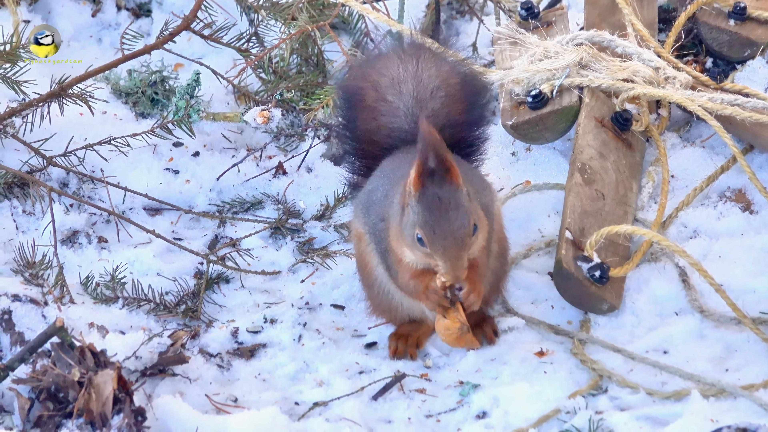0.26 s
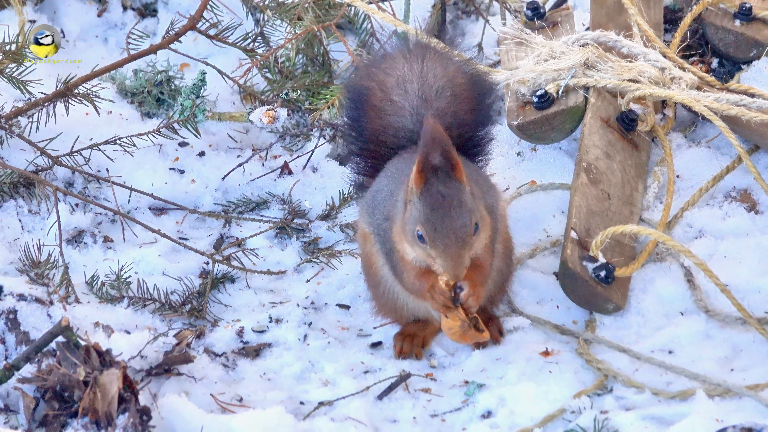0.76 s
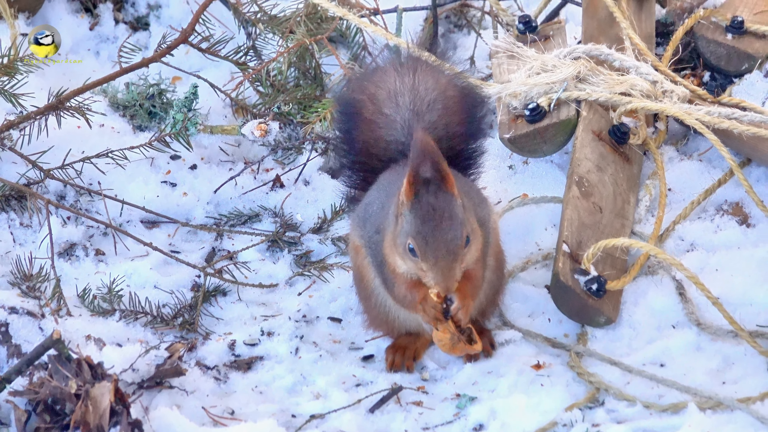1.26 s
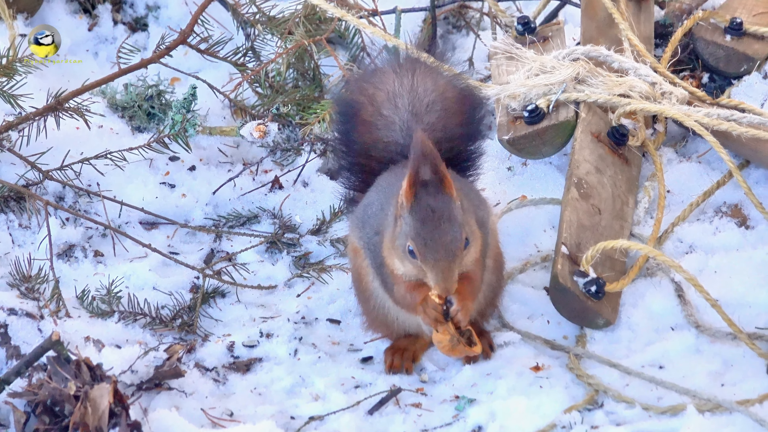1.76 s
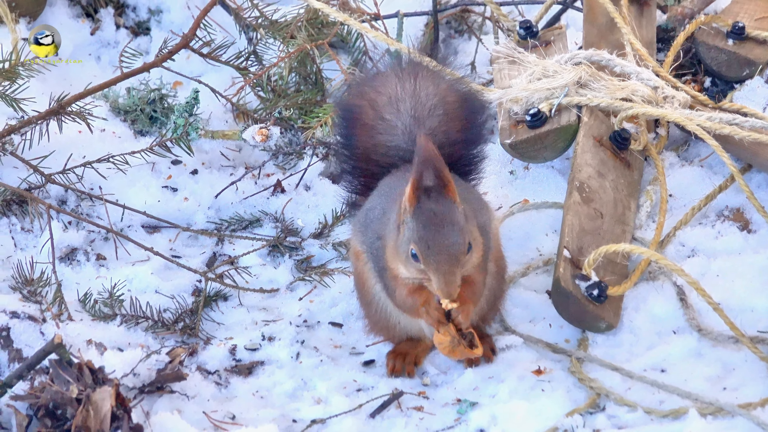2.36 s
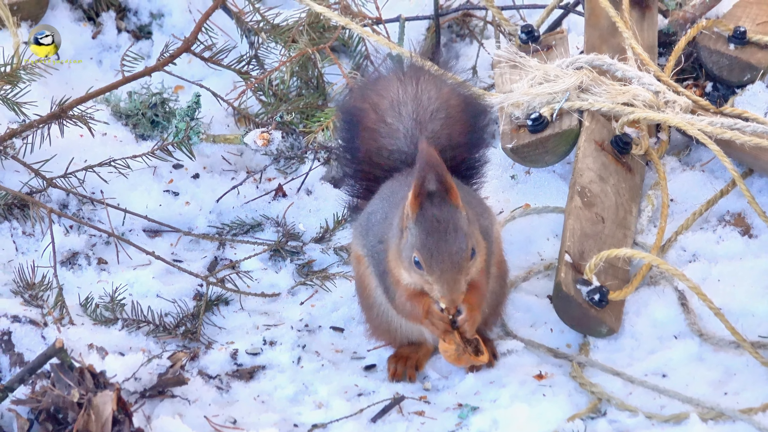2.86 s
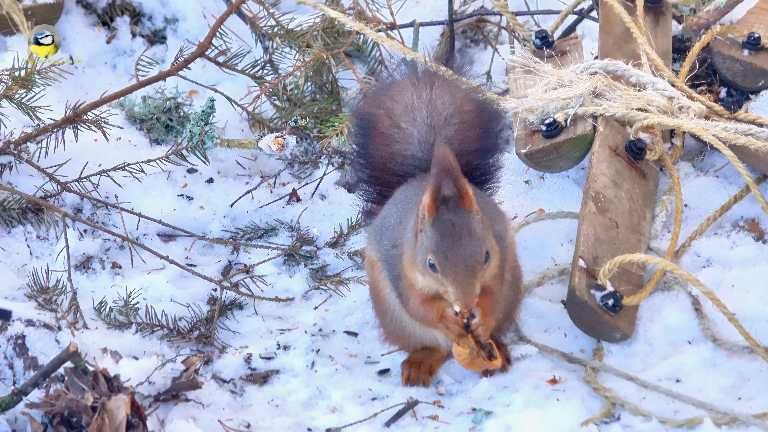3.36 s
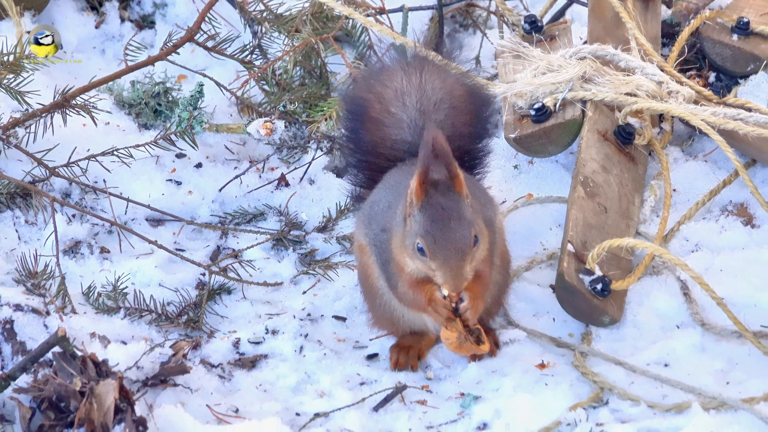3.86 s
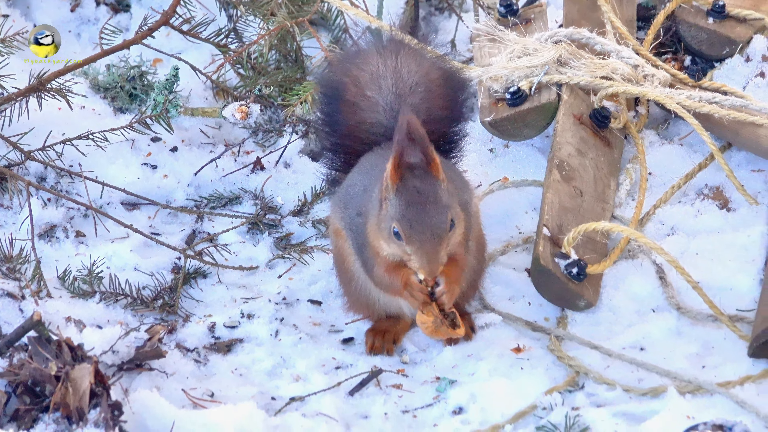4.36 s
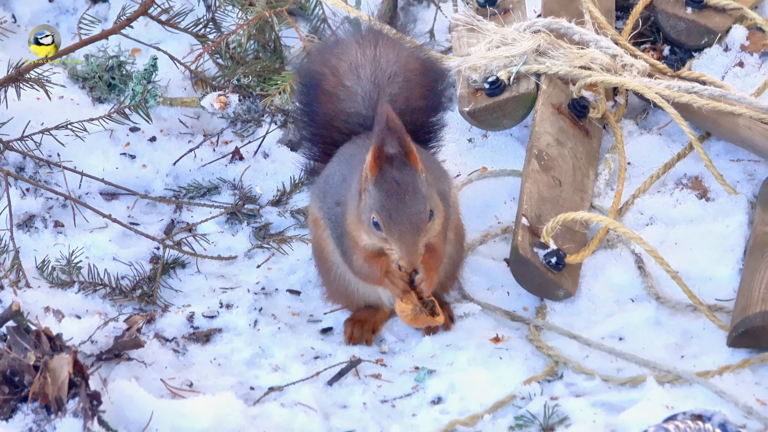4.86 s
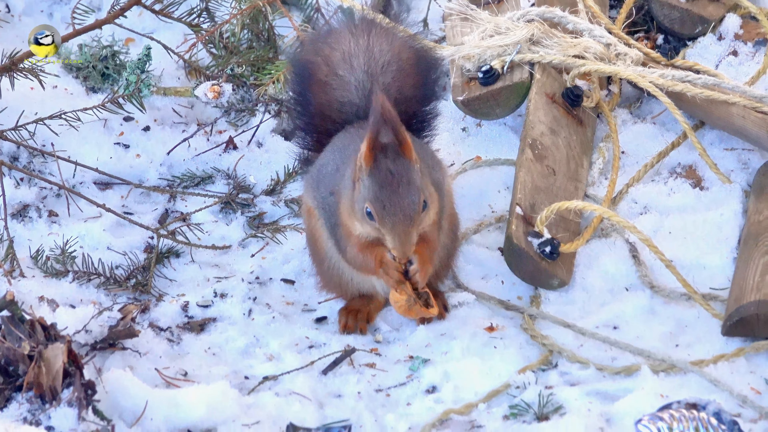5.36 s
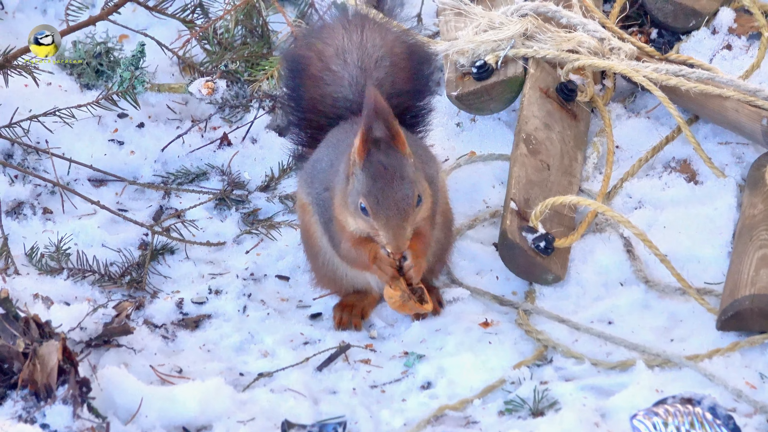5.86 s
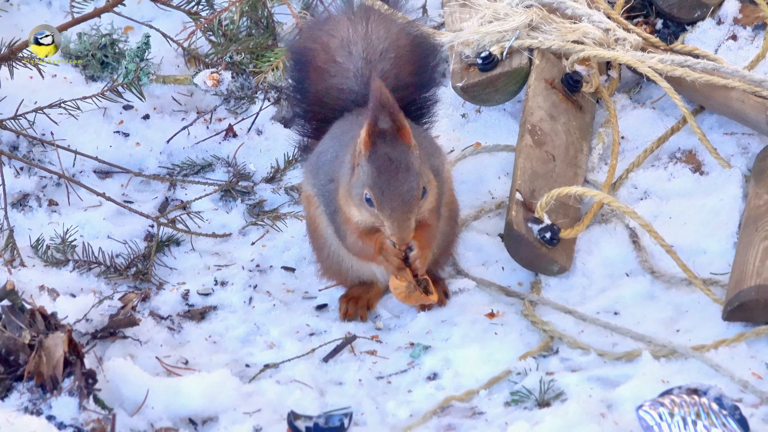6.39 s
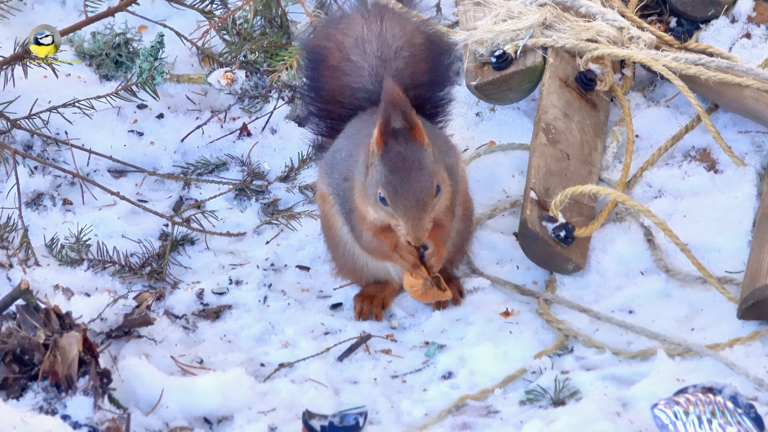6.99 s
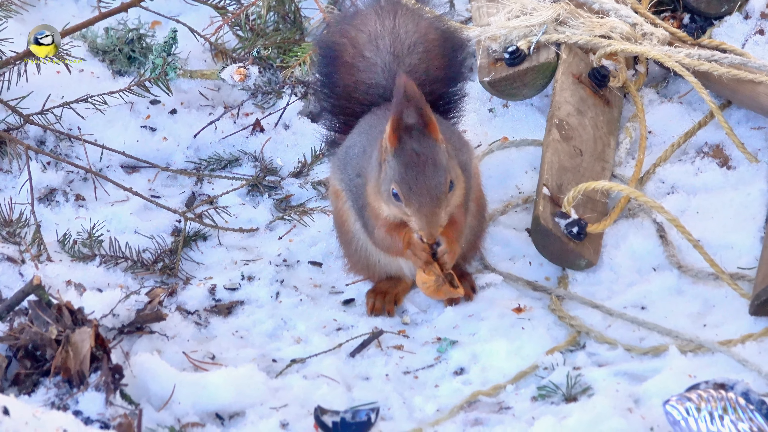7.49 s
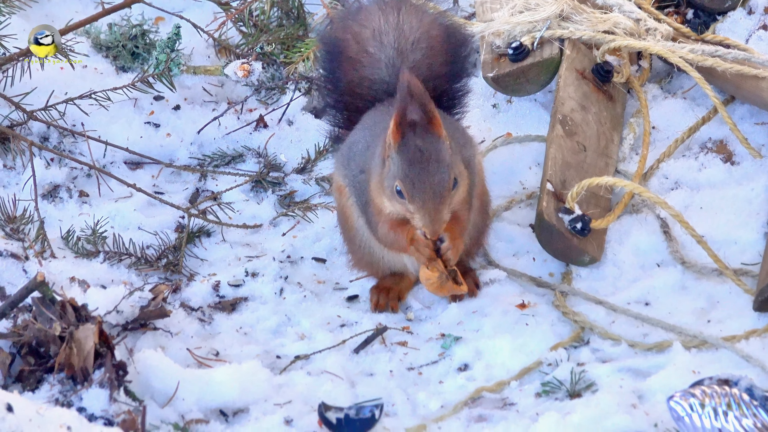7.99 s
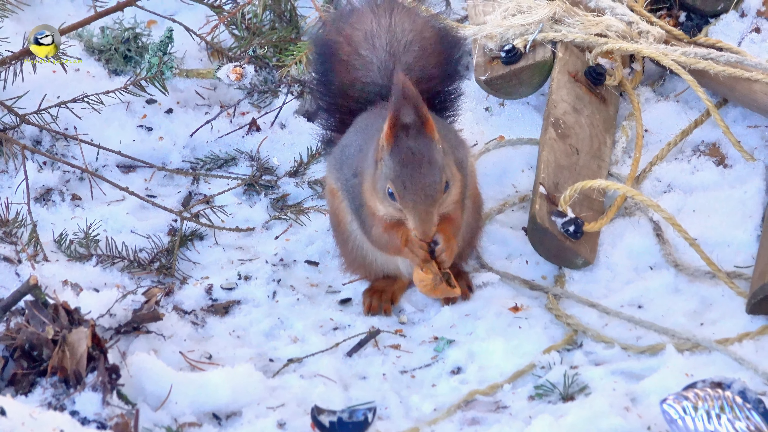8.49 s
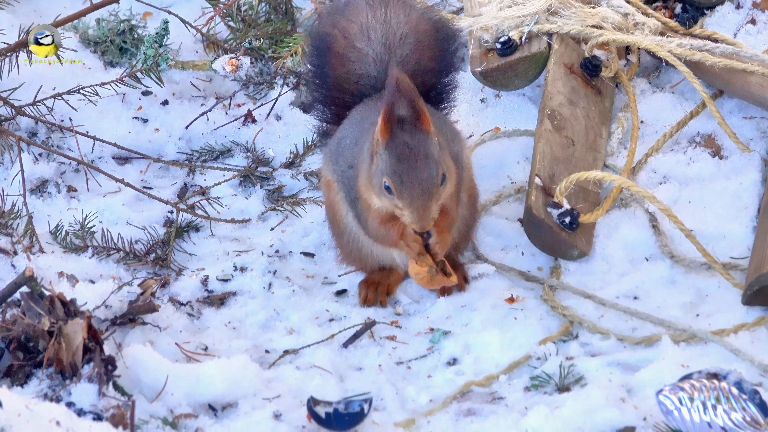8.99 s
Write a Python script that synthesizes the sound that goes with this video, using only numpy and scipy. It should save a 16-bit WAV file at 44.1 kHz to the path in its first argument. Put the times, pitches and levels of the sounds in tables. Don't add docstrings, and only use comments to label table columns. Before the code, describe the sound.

An open winter garden, heard through a microphone with soft hiss. After a nearly quiet opening second, a flock of small songbirds chatters in clusters of fast, bending whistles, pausing and resuming, lively again toward the end. Close and dry, a squirrel's teeth click on a hollow nutshell a few times, with one gritty crunch in the middle. Birds dominate and ring with scattered echoes; distant traffic is only a faint smooth bed.

```python
import sys
import numpy as np
from scipy import signal
from scipy.fft import rfft, irfft
from scipy.io import wavfile
from scipy.ndimage import uniform_filter1d

SR = 44100
rng = np.random.default_rng(int(sys.argv[2]) if len(sys.argv) > 2 else 0)


def decibels_to_gain(level_db):
    exponent = np.asarray(level_db, float) / 20
    return 10 ** exponent


def unload_wav(signal):
    wavfile.write(
        sys.argv[1],
        SR,
        np.round(np.clip(np.atleast_2d(signal).T, -1, 1) * 32767).astype(np.int16),
    )


N = 407484


def shaped(points):
    hz, db = np.transpose(points)
    bins = np.maximum(np.fft.rfftfreq(N, 1 / SR), 1)
    return decibels_to_gain(np.interp(np.log(bins), np.log(hz), db))


def noise(gain):
    return irfft(gain * rfft(rng.standard_normal(N)), N)


def hush(level_db=-55.0):
    # f/Hz, density/dB per Hz
    hush_colour = [(15, -73), (25, -34), (70, -19.5), (129, -34), (401, -19.5), (976, -6), (1460, -2.5),
                   (2100, -2.5), (2790, -6.5), (3960, -7), (7780, -18), (9140, -23), (15700, -24.5)]
    # f/Hz, level/dB
    hush_width = [(150, -27), (900, -10), (8500, -4.5), (9500, -1.5), (10500, -10)]
    gain = shaped(hush_colour)
    mid = noise(gain)
    side = noise(gain * shaped(hush_width))
    return np.array([mid + side, mid - side]) * decibels_to_gain(level_db) / np.std(mid)


def flutter(rate_hz):
    wander = rng.standard_normal(N)
    for sharpness in (1.5, 0.7):
        wander = signal.lfilter(*signal.iirpeak(rate_hz, sharpness, SR), wander)
    wander = signal.sosfilt(signal.butter(4, 2 * rate_hz, fs=SR, output="sos"), wander)
    return wander / np.std(wander)


def songbook():
    # t/s, start f/Hz, level/dB
    pips = [(0.01, 4190, -59), (0.091, 4200, -60), (0.183, 6630, -63.5), (1.842, 5360, -46),
            (2.017, 3660, -48.5), (2.106, 4604, -37.5), (2.261, 6430, -51), (5.798, 5570, -50.5),
            (8.205, 5490, -54), (6.929, 5550, -48), (7.084, 3740, -48), (7.112, 3700, -45),
            (8.083, 8400, -55.5), (8.131, 8100, -47), (8.501, 3645, -37), (8.611, 2386, -46),
            (8.724, 2430, -46), (8.745, 3280, -43), (9.193, 3800, -41), (9.203, 3470, -41)]
    peeps = [(1.435, 7780, -74), (1.66, 8700, -69), (1.49, 3770, -62), (1.747, 5470, -58),
             (1.766, 8150, -59), (1.926, 7720, -54), (2.123, 4580, -43), (2.297, 8300, -63),
             (2.484, 4580, -47), (2.496, 4530, -42), (2.861, 5060, -50), (3.824, 5000, -47),
             (3.876, 8070, -67), (4.832, 6900, -55.5), (6.039, 8400, -61), (6.088, 6220, -55),
             (6.338, 8600, -65), (9.117, 5180, -38.5)]
    dips = [(0.373, 6800, -64), (1.79, 7500, -50.5), (2.275, 6180, -46.5), (2.567, 6000, -44),
            (2.586, 5750, -44), (3.052, 3475, -40), (3.897, 7700, -61), (6.106, 5560, -49),
            (6.902, 5890, -41.5), (7.337, 8750, -64)]
    falls = [(1.928, 6960, -51), (2.152, 6110, -48), (2.174, 5420, -44), (2.597, 5350, -42),
             (2.856, 6050, -44), (2.868, 5330, -46), (6.127, 5640, -41.5), (7.995, 5910, -43)]
    plunges = [
        (2.094, 4420, -50),
        (2.352, 8100, -52),
        (5.682, 5590, -47),
        (6.949, 4800, -51.5),
    ]
    lifts = [(1.67, 4500, -54), (1.824, 5360, -45.5), (2.094, 7000, -58), (3.011, 3530, -42.5),
             (6.414, 5250, -41), (7.978, 5540, -44)]
    leaps = [
        (1.464, 3600, -62),
        (2.019, 3790, -44),
    ]
    # t/s, length/ms, pitch f/Hz, level/dB
    held = [(0.388, 23, 5680, -61.5), (.5, 27, 4390, -68), (1.393, 60, 4020, -65.5), (1.626, 28, 4470, -63),
            (1.723, 36, 7850, -61.5), (2.036, 22, 4750, -48), (2.062, 41, 4570, -44),
            (2.106, 76, 3110, -55), (2.511, 86, 8100, -67), (3.882, 30, 4070, -47),
            (3.885, 29, 4950, -48.5), (4.315, 44, 3820, -45), (4.785, 42, 7300, -63.5),
            (5.466, 89, 3960, -62), (5.85, 94, 6020, -58), (6.654, 52, 6200, -46), (7.009, 66, 3646, -54),
            (7.679, 140, 7500, -66), (8.411, 96, 4090, -47), (8.485, 38, 5064, -36),
            (8.522, 36.6, 5123, -33), (9.133, 32, 3747, -38), (9.209, 54, 4680, -42.5)]
    # t/s, length/ms, start f/Hz, end f/Hz, level/dB
    glides = [(1.667, 8.5, 3790, 3760, -48), (1.824, 33, 5100, 4070, -43.5), (2.4, 29, 6900, 5580, -53.5),
              (2.625, 36, 6950, 6900, -54), (4.46, 104, 7500, 7230, -69), (5.669, 21, 7500, 6950, -60),
              (5.946, 61, 7760, 8100, -62.5), (6.842, 58, 7430, 5850, -50.5), (8.574, 22, 4040, 2930, -39),
              (7.336, 28, 7300, 6200, -59), (7.348, 46, 4110, 3860, -52), (7.872, 70, 5230, 4820, -55.5),
              (8.366, 44, 4324, 3830, -32), (8.79, 32, 2910, 2996, -45), (9.166, 23, 4720, 4270, -44)]
    # t/s, length/ms, start f/Hz, end f/Hz, level/dB
    hooks = [
        (1.863, 29, 7160, 7870, -55.5),
        (2.149, 16, 7740, 6700, -49),
        (2.165, 15, 4180, 3600, -48),
        (8.004, 19, 5250, 4020, -39.5),
    ]
    # t/s, length/ms, start f/Hz, middle f/Hz, level/dB
    scoops = [
        (3.105, 23, 2810, 2240, -48.5),
        (7.207, 18.7, 5340, 5200, -39),
    ]
    # t/s, length/ms, outer f/Hz, middle f/Hz, level/dB
    arches = [
        (1.357, 31, 4210, 3880, -57.5),
        (3.057, 23, 4200, 4550, -48),
        (5.821, 27, 5800, 4990, -43.5),
        (6.117, 17, 4470, 5500, -42),
        (7.772, 44, 5430, 4460, -53.5),
        (8.483, 17, 4070, 4780, -40.5),
    ]
    hook_reach = 0.88
    scoop_back = 0.35

    # (length ms, end pitch over start pitch, songs)
    kinds = [(15, 1, pips), (31, 1, peeps), (15, 0.91, dips), (11.6, 0.82, falls),
             (20, 0.67, plunges), (14, 1.09, lifts), (14.7, 1.31, leaps)]
    straight = [(s, ms, hz, hz * ratio, db) for ms, ratio, rows in kinds for s, hz, db in rows]
    straight += [(s, ms, hz, hz, db) for s, ms, hz, db in held]
    straight += list(glides)

    notes = [(s, ms, a, (a + b) / 2, b, db) for s, ms, a, b, db in straight]
    notes += [(s, ms, a, a + hook_reach * (b - a), b, db) for s, ms, a, b, db in hooks]
    notes += [(s, ms, a, mid, mid + scoop_back * (a - mid), db) for s, ms, a, mid, db in scoops]
    notes += [(s, ms, a, mid, a, db) for s, ms, a, mid, db in arches]
    return notes


def whistle(shake, s, ms, start_hz, mid_hz, end_hz, swing_hz, db):
    length = ms * SR / 1000
    u = np.arange(int(length)) / length
    hz = start_hz * (1 - u) * (1 - 2 * u) + 4 * mid_hz * u * (1 - u) + end_hz * u * (2 * u - 1)
    at = int(s * SR + 7 * mid_hz) + np.arange(len(u))
    hz = hz + swing_hz * shake[at % N]
    edge = np.sin(np.pi / 2 * np.minimum(np.minimum(u, 1 - u) * ms / 3, 1)) ** 2
    swell = np.sin(np.pi * u) ** 0.03
    return decibels_to_gain(db) * edge * swell * np.sin(2 * np.pi * np.cumsum(hz) / SR)


def warble(points, shake, swing_hz=45, throb_db=2.0):
    s, hz, db = np.transpose(points)
    t = np.arange(s[0], s[-1], 1 / SR)
    hz = uniform_filter1d(np.interp(t, s, hz), 90, mode="nearest")
    db = uniform_filter1d(np.interp(t, s, db), 90, mode="nearest")
    at = (t * SR + 7 * hz[0]).astype(int)
    hz = hz + swing_hz * shake[at % N]
    db = db + throb_db * shake[(at + N // 2) % N]
    edge = np.sin(np.pi / 2 * np.minimum(np.minimum(t - s[0], s[-1] - t) / 0.0015, 1)) ** 2
    return decibels_to_gain(db) * edge * np.sin(2 * np.pi * np.cumsum(hz) / SR)


def add(track, sound, s):
    at = int(s * SR)
    track[at:at + len(sound)] += sound[:N - at]


def birds(breath_db, throb_db=2.5):
    # t/s, length/ms, pitch f/Hz, level/dB
    trills = [(1.849, 250, 5720, -57), (1.95, 200, 8080, -64), (2.66, 210, 5970, -56.5),
              (2.69, 92, 6780, -54), (2.82, 144, 7180, -54.5), (3.04, 99, 8260, -62),
              (3.335, 54, 3850, -43.5), (3.405, 92, 3505, -48.5), (3.801, 120, 5500, -55),
              (4.79, 204, 8160, -67.5), (4.84, 140, 6840, -63), (6.07, 180, 3700, -60.5),
              (6.135, 87, 6140, -58), (6.505, 83, 6350, -45.5), (6.581, 74, 6040, -43.5),
              (7.0, 240, 6670, -67), (7.36, 120, 7650, -66), (7.936, 88, 7560, -48.5),
              (8.05, 78, 7150, -52), (8.32, 130, 7200, -56.5), (8.5, 110, 3910, -52), (8.81, 93, 2840, -50),
              (9.219, 26, 3610, -48)]
    # t/s, pitch f/Hz, level/dB
    warbles_early = [
        [(1.68, 3720, -54), (1.69, 4010, -47.5), (1.7, 3660, -46.5), (1.708, 2940, -60), (1.716, 3280, -54),
         (1.722, 3750, -52)],
        [(1.745, 3340, -49), (1.751, 4520, -35), (1.756, 4725, -32), (1.762, 3940, -48), (1.765, 3700, -39)],
        [(1.919, 3365, -54), (1.924, 4340, -38.5), (1.933, 4670, -38), (1.942, 4320, -59), (1.947, 4150, -48)],
        [(2.993, 3035, -40), (2.997, 4400, -44), (3.002, 3785, -47), (3.006, 3780, -38), (3.012, 3100, -43)],
        [(3.026, 3200, -46), (3.029, 3750, -44), (3.033, 3055, -39), (3.039, 2570, -48), (3.044, 2350, -40.5),
         (3.049, 2780, -51)],
        [(3.198, 4420, -45), (3.21, 4644, -35), (3.22, 4830, -45), (3.228, 5200, -44), (3.24, 4850, -41.5),
         (3.26, 4720, -41), (3.28, 4510, -43), (3.292, 4250, -31)],
        [(3.218, 4290, -47), (3.24, 4200, -44), (3.26, 4000, -37), (3.285, 3967, -40.5), (3.3, 4110, -39),
         (3.312, 4080, -42.5)],
        [(3.313, 3470, -46), (3.318, 3860, -43), (3.324, 3550, -31.5), (3.331, 3340, -41.5), (3.342, 4130, -49)],
        [(3.36, 3053, -36), (3.368, 3870, -41), (3.378, 3626, -56), (3.387, 3806, -32.5), (3.392, 3146, -38.5),
         (3.398, 4050, -46), (3.404, 4240, -46)],
        [(3.434, 2890, -44.5), (3.445, 3010, -53), (3.456, 3300, -50)],
        [(3.455, 2625, -54), (3.462, 2340, -56), (3.468, 2880, -42)],
    ]
    warbles_middle = [
        [(3.77, 6660, -57), (3.774, 5990, -47), (3.784, 6130, -49), (3.792, 5660, -48), (3.799, 4940, -46),
         (3.812, 4710, -46)],
        [(3.817, 4990, -39), (3.821, 4310, -35), (3.827, 3940, -42.5), (3.836, 3970, -46)],
        [(3.936, 4420, -40), (3.941, 4570, -36), (3.965, 4506, -34.5), (3.99, 4440, -35), (4.045, 4420, -39.5)],
        [(4.279, 4990, -40), (4.288, 4350, -38.5), (4.298, 3926, -37), (4.312, 3920, -41)],
        [(4.389, 4710, -47), (4.425, 4600, -33.5), (4.445, 4533, -38.5), (4.466, 4590, -39)],
        [(5.896, 6500, -50), (5.912, 6230, -48), (5.93, 7260, -56), (5.94, 7600, -60)],
        [(5.867, 4490, -50), (5.875, 5630, -39), (5.881, 4700, -50), (5.887, 4730, -38), (5.891, 5000, -47)],
        [(5.924, 4510, -43), (5.931, 5540, -42), (5.938, 4980, -38.5), (5.947, 4540, -41.5), (5.958, 4780, -48),
         (5.967, 4370, -51), (5.977, 4900, -39), (5.987, 4510, -54), (6.001, 5460, -29.5)],
        [(6.008, 5320, -43), (6.016, 5600, -41), (6.028, 5250, -38), (6.043, 4530, -48), (6.05, 4350, -66),
         (6.058, 4630, -40), (6.066, 5170, -43), (6.071, 5400, -54)],
        [(6.363, 7650, -44), (6.369, 6600, -47), (6.373, 6300, -44.5), (6.38, 7040, -44), (6.386, 6670, -48),
         (6.392, 5930, -41), (6.402, 6770, -44), (6.411, 5960, -36)],
        [(6.378, 4890, -50), (6.385, 4650, -50), (6.395, 5050, -58), (6.41, 4810, -46), (6.416, 5070, -40),
         (6.425, 4630, -41.5), (6.435, 3970, -64), (6.441, 4200, -54), (6.447, 5100, -44)],
        [(6.897, 5130, -63), (6.91, 5030, -41.5), (6.922, 4860, -33.5), (6.935, 4540, -46), (6.943, 4370, -49),
         (6.955, 4770, -49)],
    ]
    warbles_late = [
        [(6.508, 5500, -46), (6.518, 4840, -47), (6.535, 4750, -50), (6.56, 4870, -49), (6.58, 4650, -58)],
        [(7.105, 3890, -52), (7.114, 4560, -48), (7.119, 5100, -38)],
        [(7.133, 3740, -50), (7.14, 4820, -47), (7.148, 5200, -51), (7.16, 5070, -64)],
        [(7.232, 5390, -46), (7.248, 4790, -33.5), (7.262, 4420, -45), (7.268, 4560, -57), (7.274, 5100, -46)],
        [(8.245, 3920, -37), (8.248, 4770, -37.5), (8.255, 3520, -40.5), (8.262, 3200, -39.5),
         (8.275, 3066, -46), (8.292, 3248, -37), (8.299, 3000, -47.5), (8.305, 2680, -43)],
        [(8.302, 7260, -48), (8.308, 6550, -53), (8.32, 7000, -58), (8.335, 7350, -57)],
        [(8.707, 3320, -38), (8.715, 4360, -40), (8.722, 4570, -36.5), (8.738, 4690, -54)],
        [(8.762, 2370, -47), (8.772, 2520, -53), (8.784, 2960, -40)],
        [(8.915, 3080, -52), (8.921, 3680, -49), (8.926, 4050, -52)],
        [(9.006, 7210, -50), (9.014, 6720, -45), (9.03, 6360, -44.5), (9.041, 6180, -36), (9.048, 5740, -38.5),
         (9.054, 5100, -35)],
        [(9.02, 3200, -48), (9.024, 4590, -55), (9.029, 4030, -47), (9.033, 3230, -31)],
        [(9.066, 4936, -40), (9.072, 4920, -30), (9.082, 4560, -37), (9.09, 4190, -43), (9.097, 3996, -35.5),
         (9.11, 3770, -39.5), (9.128, 3750, -39)],
        [(9.176, 4040, -44), (9.18, 3600, -41), (9.184, 3250, -37)],
    ]
    # t/s, pitch f/Hz, level/dB
    warbles_high = [
        [(2.562, 7480, -54), (2.57, 6830, -52), (2.592, 6600, -57)],
        [(2.62, 7700, -60), (2.635, 6700, -50), (2.648, 5850, -42.5), (2.66, 5590, -43)],
        [(2.748, 8070, -54), (2.77, 7900, -56), (2.795, 7600, -55)],
        [(2.934, 6220, -51), (2.95, 6140, -49), (2.972, 6100, -57), (2.99, 6150, -51), (3.06, 6090, -51.5),
         (3.095, 6076, -40.5), (3.165, 6004, -55)],
        [(4.008, 8200, -56), (4.016, 7720, -41), (4.023, 6890, -41.5), (4.042, 7120, -45), (4.056, 6900, -51)],
        [(4.01, 8940, -50), (4.018, 9040, -58), (4.026, 8400, -52), (4.045, 8600, -49), (4.056, 9140, -48),
         (4.064, 8960, -52)],
        [(4.021, 14150, -64), (4.03, 13900, -63), (4.042, 14200, -62), (4.05, 14800, -67)],
        [(4.049, 7460, -44), (4.056, 7800, -36), (4.062, 7170, -40), (4.068, 6480, -43), (4.078, 6430, -49)],
        [(4.69, 7180, -64), (4.73, 7060, -67), (4.748, 6760, -60), (4.756, 6400, -62)],
        [(4.866, 6900, -48), (4.872, 6820, -45.5), (4.884, 6160, -57), (4.89, 6600, -60)],
        [(5.072, 7250, -66), (5.09, 7300, -59), (5.12, 7340, -64), (5.133, 7200, -61), (5.138, 6800, -63)],
        [(5.112, 8300, -68), (5.125, 8200, -65), (5.138, 7750, -65)],
        [(7.82, 8500, -65), (7.831, 6980, -53), (7.843, 6780, -49), (7.868, 7200, -53), (7.895, 7360, -51),
         (7.91, 6900, -45), (7.918, 7370, -36)],
        [(8.124, 7270, -57), (8.132, 6500, -50), (8.148, 6100, -44), (8.154, 5740, -38.5), (8.165, 5250, -45),
         (8.172, 5400, -52)],
    ]
    # t/s, pitch f/Hz, level/dB
    warbles_drawn = [
        [(0.408, 3880, -58), (0.418, 4360, -53), (0.428, 4430, -51.5), (0.458, 4300, -73)],
        [(2.219, 3785, -48), (2.245, 3790, -40), (2.27, 4033, -34), (2.3, 4315, -39.5), (2.35, 4370, -42)],
        [(3.07, 3250, -40), (3.076, 3426, -42), (3.086, 3144, -42), (3.092, 3357, -40.5), (3.125, 3280, -45)],
        [(6.437, 5600, -39), (6.45, 5330, -35.5), (6.465, 5346, -34), (6.485, 5600, -42), (6.505, 5670, -39),
         (6.514, 5570, -38)],
    ]
    waver = 0.025 * np.sqrt(decibels_to_gain(breath_db))
    trill_swing_hz = 300
    notes = [(s, ms, a, mid, b, waver[int(s * SR)] * mid, db) for s, ms, a, mid, b, db in songbook()]
    notes += [(s, ms, hz, hz, hz, trill_swing_hz, db) for s, ms, hz, db in trills]

    track = np.zeros(N)
    shake = 2.05 * np.tanh(0.834 * flutter(rate_hz=108.8))
    for note in notes:
        add(track, whistle(shake, *note), note[0])
    throb = decibels_to_gain(throb_db * flutter(rate_hz=67.0))
    haze = decibels_to_gain(breath_db) * flutter(rate_hz=880)
    track = track * (throb + haze)
    for phrases in (warbles_early, warbles_middle, warbles_late, warbles_high, warbles_drawn):
        for points in phrases:
            add(track, warble(points, shake), points[0][0])
    return signal.sosfilt(signal.butter(4, 1800, "high", fs=SR, output="sos"), track)


def yard(x, tail_db=0.0, side_db=-7.5, early_s=0.16, late_s=1.18, late_db=-7.0):
    t = np.arange(int(1.6 * SR)) / SR
    near, far = rng.standard_normal((2, 2, len(t)))
    far = signal.lfilter([0.4], [1, -0.65], far)
    tail = near * decibels_to_gain(-60 * t / early_s) + far * decibels_to_gain(late_db - 60 * t / late_s)
    tail = tail * (1 - np.exp(-t / 0.013))
    lumps = np.repeat(rng.standard_normal(len(t) // 128 + 1), 128)[:len(t)]
    tail = tail * decibels_to_gain(1.05 * lumps)
    tail = tail / np.sqrt(np.sum(tail[0] ** 2)) * decibels_to_gain(tail_db + np.array([[0], [side_db]]))
    return signal.fftconvolve(x[None], tail, axes=1)[:, :N]


def gnawing():
    # t/s, length/ms, level/dB
    bites = [
        (2.913, 5.8, -54),
        (3.771, 4, -55),
        (4.565, 20.5, -49),
        (7.843, 6, -56),
    ]
    # f/Hz, width/Hz, level/dB
    shell = [
        (2500, 840, 9.5),
        (5630, 980, 8),
        (3900, 1500, 1),
    ]
    cracks = np.zeros(N)
    chance = rng.random((2, N))
    crack_size = decibels_to_gain(-2.5 * np.log(chance[1]))
    grit = (chance[0] < 0.15) * rng.standard_normal(N) * crack_size
    for s, ms, db in bites:
        at, size = int(s * SR), int(ms * SR / 1000)
        bite = grit[at:at + size]
        add(cracks, decibels_to_gain(db) * bite / np.std(bite), s)
    ring = np.zeros(N)
    for hz, width, db in shell:
        ring += decibels_to_gain(db) * signal.lfilter(*signal.iirpeak(hz, hz / width, SR), cracks)
    return signal.sosfilt(signal.butter(4, 12500, fs=SR, output="sos"), ring)


def scene():
    # t/s, left minus right/dB, echo share/dB (lower when near), breathiness/dB
    perches = [(0, 0, -3.5, -30), (3.1, -1.5, -0.5, -9), (3.6, -0.5, 0, -18), (3.9, 0, 0, -23),
               (4.6, -1, -1.5, -24), (5.401, 5, -2, -23), (6.1, 2, -2.5, -16), (6.6, 3, -3, -25),
               (7.3, 0, -5, -24), (8.3, -1, 1, -34), (9.3, -1.5, -2, -8.5)]
    s, *columns = np.transpose(perches)
    t = np.arange(N) / SR
    pan_db, echo_db, breath_db = (np.interp(t, s, column) for column in columns)
    song = birds(breath_db) * decibels_to_gain(4.0)
    echoing = signal.sosfilt(signal.butter(4, 2470, "high", fs=SR, output="sos"), song)
    mid, side = yard(echoing * decibels_to_gain(echo_db))
    trees = np.array([song + mid + side, song + mid - side])
    trees = trees * decibels_to_gain(np.array([pan_db, -pan_db]) / 2)
    return trees + gnawing() + hush()


def low_pass(x):
    return signal.sosfilt(signal.butter(12, 15730, fs=SR, output="sos"), x)


def record(dry):
    closing = np.minimum(np.arange(N, 0, -1) / 40, 1)
    return low_pass(dry * closing)


dry = scene()
out = record(dry)
unload_wav(out)
```